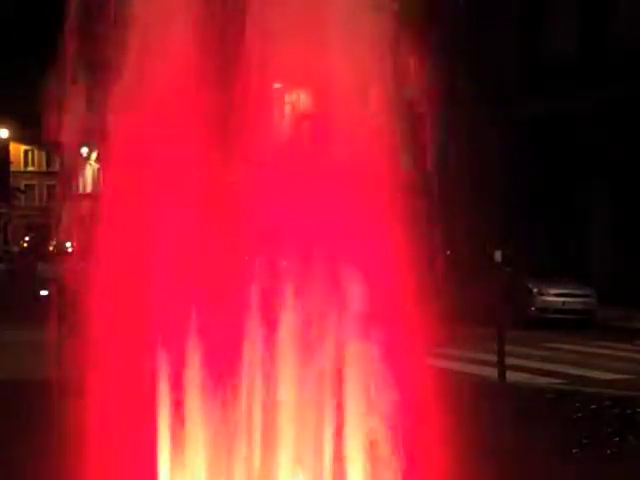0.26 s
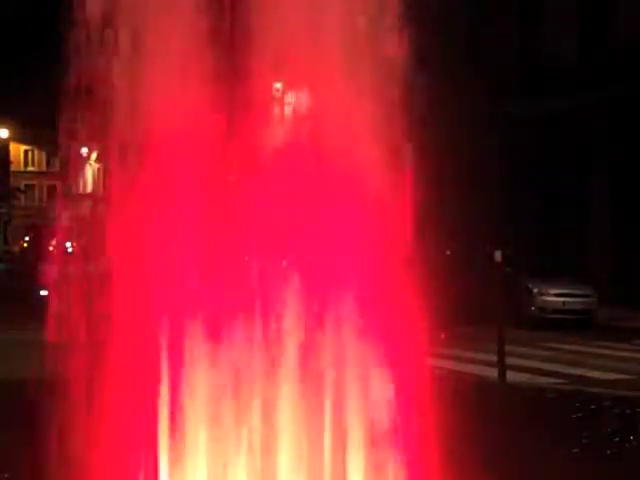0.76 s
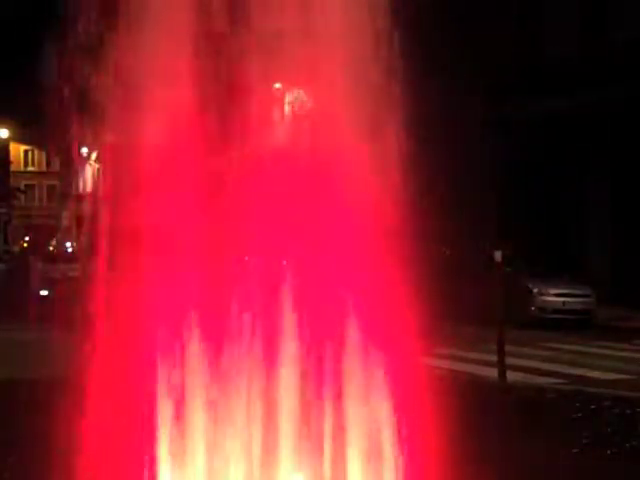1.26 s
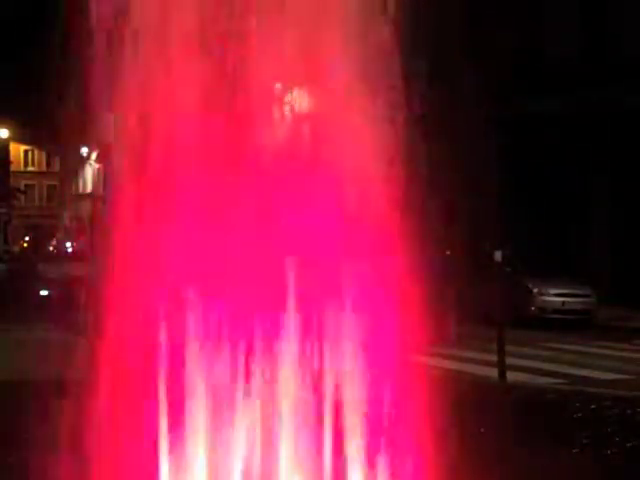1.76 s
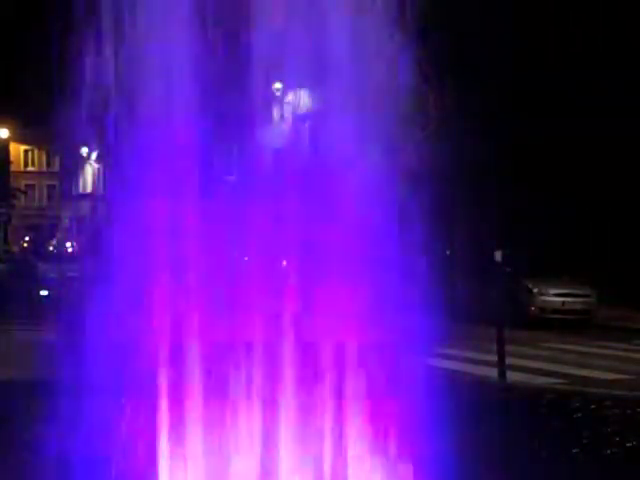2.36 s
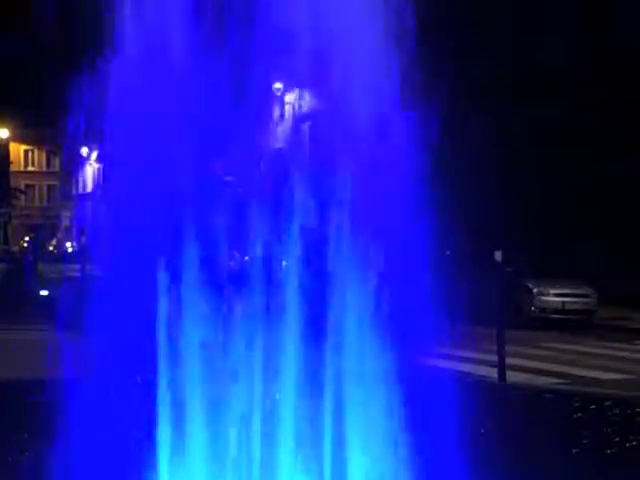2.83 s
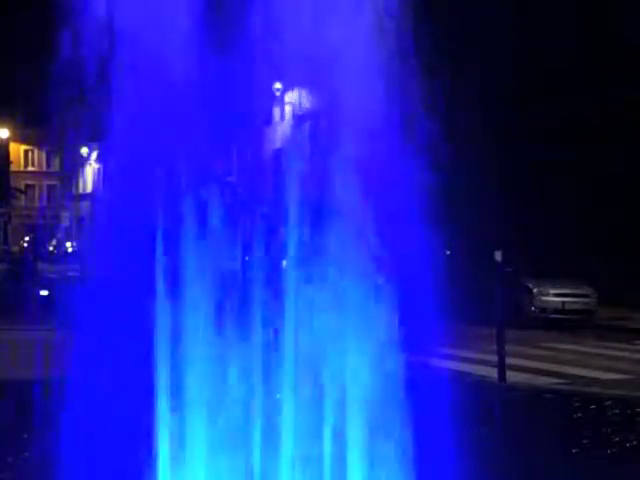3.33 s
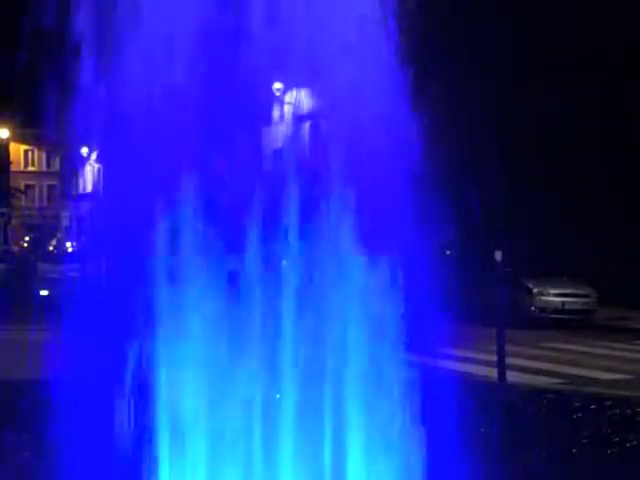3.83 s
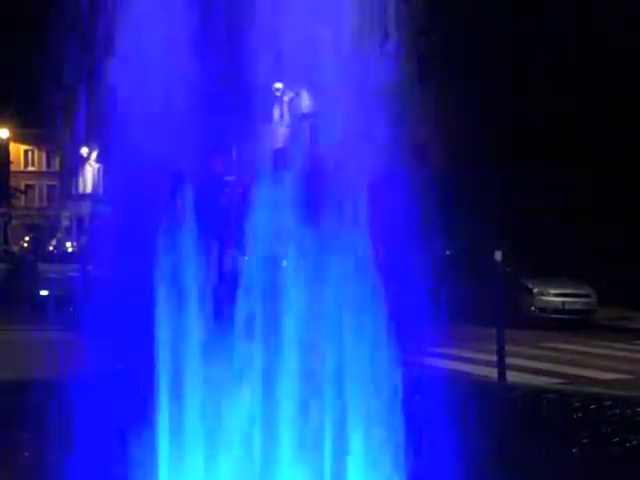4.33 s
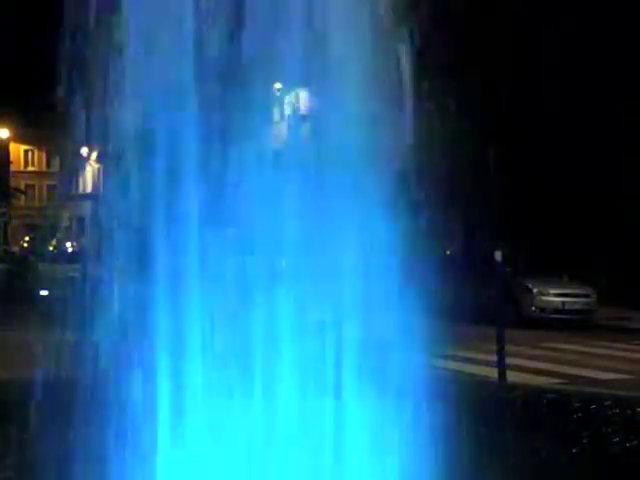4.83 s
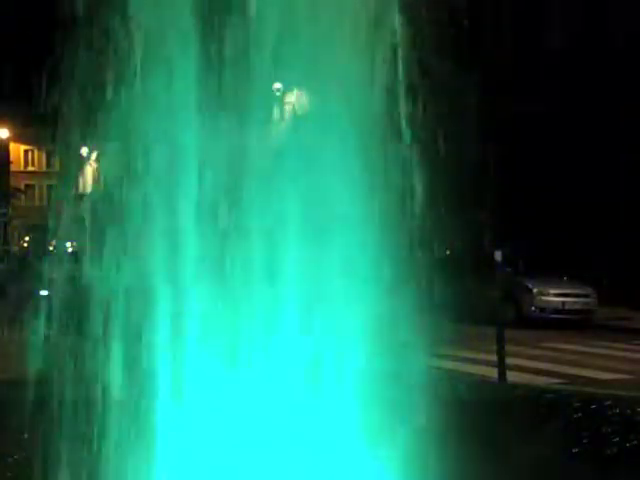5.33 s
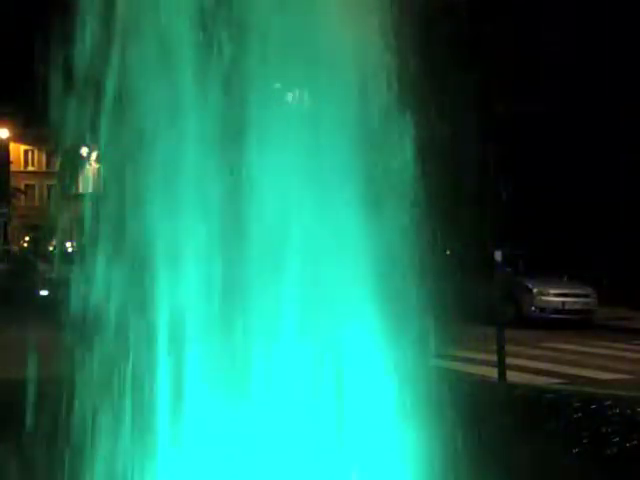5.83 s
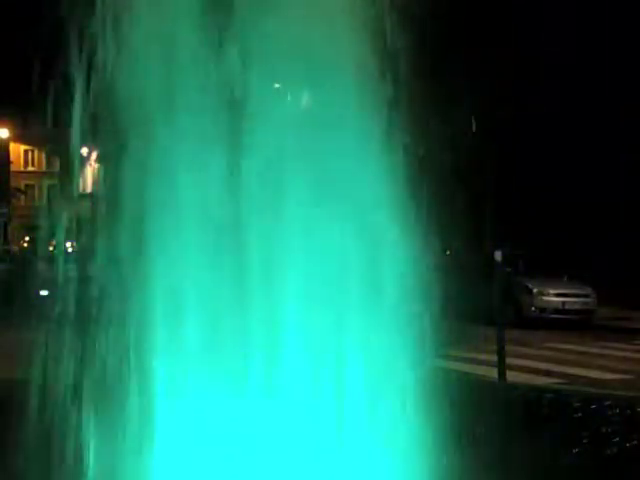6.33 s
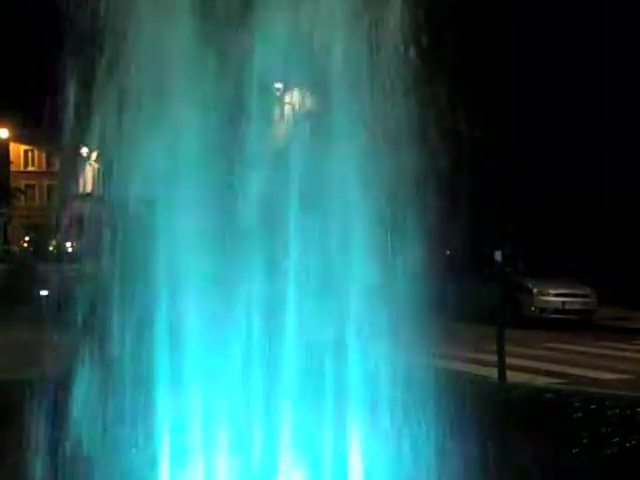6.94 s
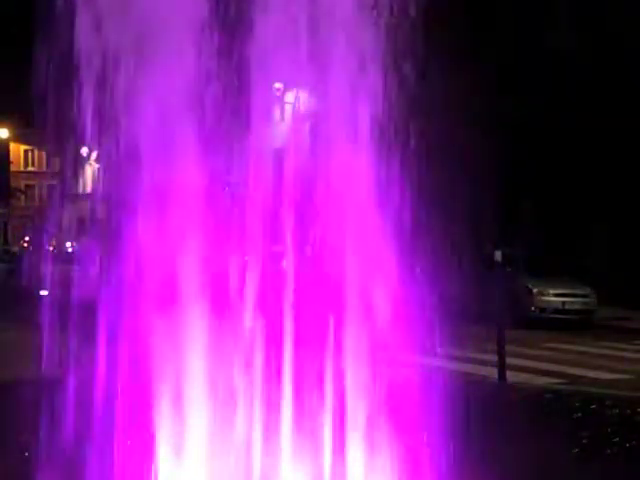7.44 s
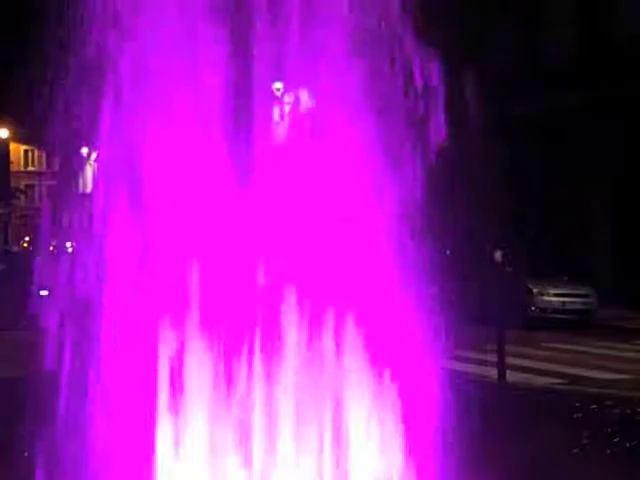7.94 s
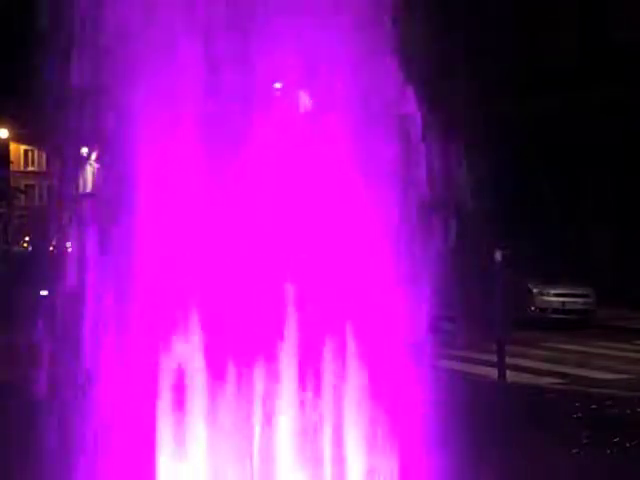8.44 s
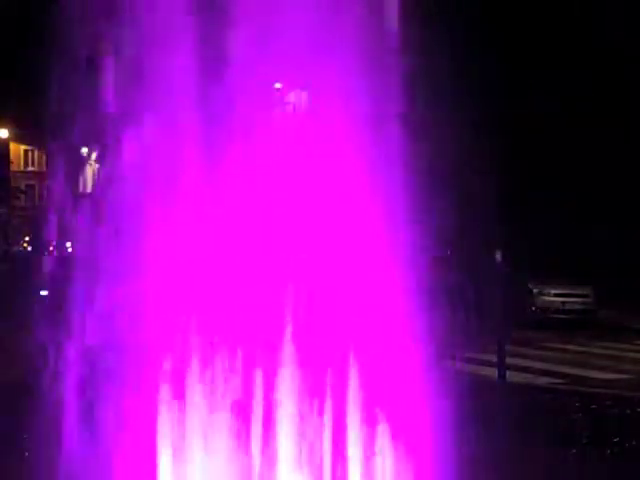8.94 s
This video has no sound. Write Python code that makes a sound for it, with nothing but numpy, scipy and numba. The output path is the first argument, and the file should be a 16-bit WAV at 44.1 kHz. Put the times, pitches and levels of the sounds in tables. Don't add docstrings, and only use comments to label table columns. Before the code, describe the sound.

A strong fountain outdoors at night, heard from a few metres away. A continuous bright hiss of thousands of falling drops crackles and flutters, with irregular slaps on wet paving, sharp near ticks and quiet low bubble gulps. Very faint pump hum, town rumble and a distant engine pulling away lie beneath. Phone-like stereo, crisp and wide in the treble, thin in the bass.

```python
import sys
import numpy as np
from scipy import signal
from scipy.fft import rfft, irfft, next_fast_len
from scipy.io import wavfile
from scipy.ndimage import uniform_filter1d
from numba import njit

SR = 44100
rng = np.random.default_rng(int(sys.argv[2]) if len(sys.argv) > 2 else 0)


def transcribe(u):
    v = np.clip(np.atleast_2d(u).T, -1, 1)
    q = np.round(v * 32767).astype(np.int16)
    wavfile.write(sys.argv[1], SR, q)


def level_to_linear(level):
    exponent = np.asarray(level, float) / 20
    return 10 ** exponent


N = 405274
SIZE = next_fast_len(N)
T, HZ = np.arange(N) / SR, np.fft.rfftfreq(SIZE, 1 / SR)


def colour(points):
    hz, db = np.transpose(points)
    return level_to_linear(np.interp(np.log(HZ + 1), np.log(hz), db))


def walk(rate):
    hold = int(SR / 16 / rate)
    t = T[::16]
    levels = np.repeat(rng.standard_normal(len(t) // hold + 1), hold)
    drift = uniform_filter1d(uniform_filter1d(levels, hold), hold)[:len(t)]
    return np.interp(T, t, drift / drift.std())


def swells(table):
    t = T[::64]
    bells = sum(db * np.exp(-.5 * ((t - s) / width) ** 2) for s, db, width in table)
    return np.interp(T, t, bells)


def tone(hz):
    return np.sin(2 * np.pi * np.cumsum(hz) / SR)


# [f/Hz, level/dB]
TOWN_COLOUR = [(20, -34), (35, -21), (55, -7), (100, -2.5), (200, 0.5), (350, -3), (700, -26), (1500, -40)]
# [t/s, level/dB, width/s]
BASIN_CHURN = [(0.055, -3.0, 0.035), (0.18, 3.9, 0.043), (0.713, 2.6, 0.07), (1.083, -1, 0.1),
               (1.402, 3.5, 0.12), (1.686, -3.0, 0.02), (2.355, -1.3, 0.069), (2.709, 3.5, 0.092),
               (2.948, 1, 0.02), (3.228, -2, 0.03), (3.836, -4, 0.081), (4.31, -2.8, 0.1),
               (4.505, 4, 0.017), (4.58, -3, 0.02), (4.954, -3, 0.048), (5.393, 2.7, 0.084),
               (6.58, -0.5, 0.1), (6.879, -3, 0.029), (7.159, -3, 0.04), (7.403, 3, 0.072),
               (7.847, 1.8, 0.1), (8.346, -2.6, 0.02), (8.546, 3.0, 0.09), (9.034, 2, 0.06)]


def town_rumble():
    rumble = irfft(rfft(rng.standard_normal(SIZE)) * colour(TOWN_COLOUR), SIZE)[:N]
    level_db = 1 - 46.5 + .8 * walk(5) + .9 * swells(BASIN_CHURN)
    return rumble / rumble.std() * level_to_linear(level_db)


# [t/s, turning rate f/Hz]
ENGINE_SPEED = [
    (0, 39.5),
    (2.5, 41.67),
    (6, 50),
    (8, 53.2),
    (9.19, 53.2),
]
# [f/Hz, level/dB]
EXHAUST_PIPE = [(41, -55), (54, -80), (81, -66), (87, -55.5), (102, -56), (106, -63), (125, -53),
                (138, -73)]


def far_engine():
    speed = np.interp(T, *np.transpose(ENGINE_SPEED))
    turn = 2 * np.pi * np.cumsum(speed) / SR
    pipe_hz, pipe_db = np.transpose(EXHAUST_PIPE)
    out = np.zeros(N)
    for order in (1, 2, 3):
        order_db = np.interp(np.log(order * speed), np.log(pipe_hz), pipe_db)
        out = out + level_to_linear(order_db + 5.0 + 0.93 * walk(2.54)) * np.sin(order * turn)
    return out


# [t/s, level/dB, width/s]
LOWER_PUMP_LOAD = [(0.1, -9.1, 0.08), (0.499, 8.4, 0.11), (1.522, 6.6, 0.34), (2.365, -10.9, 0.08),
                   (3.457, 6, 0.12), (4.914, -5.4, 0.08), (4.969, -12.7, 0.3), (5.128, 5.8, 0.08),
                   (5.842, -7, 0.062), (6.395, -8.8, 0.08), (8.166, -5.0, 0.08), (8.446, 3, 0.071),
                   (8.72, -5.7, 0.08), (9.079, 11, 0.08)]
# [t/s, level/dB, width/s]
HIGHER_PUMP_LOAD = [(0.688, -7.5, 0.08), (1.422, -4.4, 0.08), (2.659, 4.5, 0.3), (3.642, -5.5, 0.08),
                    (4.61, -13.6, 0.2), (6.57, 3, 0.43), (7.533, -7, 0.08), (7.533, 5.3, 0.3),
                    (7.852, 3.8, 0.12), (8.156, -7.5, 0.08), (8.401, 8, 0.08), (8.64, -7, 0.3)]


def pumps():
    low_hz = 50 * (1 + 0.0073 * walk(1.6))
    out = level_to_linear(-56 - 2 * T + 2.7 * walk(3.1) + 4.0) * tone(low_hz)
    slowing = 1 / (1 + np.exp((6.9 - T) / 0.51))
    # (pitch Hz, level dB, load, late sag Hz)
    for hz, db, load, sag_hz in ((61.3, -51, LOWER_PUMP_LOAD, 0.78), (77.3, -50, HIGHER_PUMP_LOAD, 5.5)):
        pitch_hz = (hz - sag_hz * slowing) * (1 + 0.0121 * walk(3))
        out = out + level_to_linear(db + swells(load) + 3.5) * tone(pitch_hz)
    return out


@njit
def grains(start, hz, cycles, size, glide, place, places):
    out = np.zeros((places, N + 4096))
    for j in range(len(start)):
        steps = min(int(cycles * SR / hz[j]), 4000)
        ring = np.exp(2j * np.pi * hz[j] / SR - 5 / steps)
        bend = np.exp(2j * np.pi * hz[j] * glide / SR / steps)
        z, rise, quick = size[j] + 0j, 1., np.exp(-4 * hz[j] / SR)
        for i in range(steps):
            out[place[j], start[j] + i] += z.imag * (1 - rise)
            z *= ring
            ring *= bend
            rise *= quick
    return out[:, :N]


def drops(layer, flow_db, shared, count=5):
    rate, lo_hz, hi_hz, cycles, scatter_db, surge_db, glide, db = layer
    when, pitch, rarity, sign, where = rng.random((int(rate * N / SR), 5)).T
    start = (when * N).astype(np.int64)
    hz = lo_hz * (hi_hz / lo_hz) ** pitch
    patches = np.array([walk(40) for _ in range(count)])[(pitch * count).astype(int), start]
    big_db = np.minimum(-scatter_db * np.log(rarity), 13)
    size = hz * level_to_linear(big_db + surge_db * (shared[start] + 1.62 * patches)) * np.sign(sign - .5)
    place = (where * count).astype(np.int64)
    rain = grains(start, hz, float(cycles), size, float(glide), place, count)
    return rain / np.sqrt(np.mean(rain.sum(0) ** 2)) * level_to_linear(flow_db + db)


def hits(s, db, hz, cycles, parts, count=5):
    late_s, part_db = np.transpose(parts)
    place = np.repeat((np.arange(len(s)) + count // 2) % count, len(parts))
    shift = 1 + 0.165 * rng.standard_normal((len(s), len(parts))) * (part_db < -2)
    start = ((s[:, None] + late_s) * SR).astype(np.int64)
    pitch_hz = hz[:, None] * shift
    size = level_to_linear(db[:, None] + part_db)
    return grains(start.ravel(), pitch_hz.ravel(), 1. * cycles, size.ravel(), 0.021, place, count)


# [t/s, peak level/dB, f/Hz]
BUBBLE_GULPS = [(0.13, -24, 450), (0.557, -25, 471), (0.674, -26, 576), (0.708, -19, 476),
                (0.769, -23, 540), (0.863, -24, 468), (1.266, -22.5, 471), (1.399, -29, 577),
                (2.232, -19, 740), (2.649, -22, 829), (2.748, -25, 479), (2.946, -20, 495),
                (3.106, -18, 751), (3.546, -21, 538), (4.503, -17, 754), (4.836, -21, 627),
                (5.399, -27, 479), (6.743, -20, 700), (7.4, -22, 540), (7.849, -25, 447), (8.263, -26, 430),
                (8.4, -23, 471), (8.444, -18, 759), (8.628, -18, 498), (8.659, -20, 353), (9.031, -20, 550)]


def gulps():
    s, db, hz = np.transpose(BUBBLE_GULPS)
    return hits(s, db - 5.5, hz, 17, [(0, -1), (.006, -4.5), (.017, -4.5)])


# [t/s, peak level/dB, f/Hz]
WATER_SLAPS = [(0.3356, -12, 3720), (0.877, -13, 2580), (0.952, -5, 6210), (1.196, -9, 3920),
               (1.5444, -12, 4410), (1.9325, -11, 3140), (1.9579, -8, 3200), (2.2235, -8, 4410),
               (3.016, -13, 2510), (3.266, -11, 4720), (3.471, -14, 3530), (3.6017, -7, 4690),
               (3.8254, -3.5, 2600), (3.899, -0.5, 4800), (4.4408, -12, 3820), (4.7877, -12, 3840),
               (5.231, -5, 3700), (5.7194, -9, 4060), (6.2394, -7, 6320), (6.5166, -13, 4440),
               (6.551, -8, 4260), (6.7111, -8, 4910), (6.9606, -7, 3170), (6.981, -7, 2680),
               (7.3936, -3, 4540), (8.0324, -10, 2740), (8.1549, -10, 3470), (8.736, -16, 2500),
               (8.9486, -10, 3300), (9.0109, -9, 4870)]


def slaps():
    when, level, pitch = rng.random((3, 30))
    lesser = [when * T[-1], -15.5 + 5 * (2 * level - 1), 2200 + 2800 * pitch]
    s, db, hz = np.hstack([np.transpose(WATER_SLAPS), lesser])
    return hits(s, db + 4, hz, 5.2, [(0, -35), (.0009, 2.5), (.0026, -8)])


# [t/s, peak level/dB]
NEAR_TICKS = [(0.3331, -1), (0.405, 0), (0.9263, -1), (1.1957, -3), (1.2945, -1), (1.5604, -1),
              (1.6008, -5), (1.958, 3.5), (2.2488, -3), (2.4149, -4), (2.5561, -9), (2.7277, 0), (3.489, 0),
              (3.5176, -2), (3.675, -1), (3.8249, 2.5), (3.899, 0), (3.9814, -3), (4.3131, -8.5),
              (4.6773, -4), (5.3288, -3), (5.7204, -1), (6.5889, -3), (6.7057, 0), (7.3931, -5),
              (8.034, -1), (8.0556, -1), (8.6662, -4), (8.845, -1), (4.2393, -1)]


def ticks():
    when, level = rng.random((2, 30))
    s, db = np.hstack([np.transpose(NEAR_TICKS), [when * T[-1], -13.5 + 5 * (2 * level - 1)]])
    hz = 6000 + 2500 * rng.random(len(s))
    return hits(s, db - 8, hz, 7.2, [(.0003, -3.5), (.0009, 4), (.0018, -2), (.003, -2), (.0046, -4)])


# [rate/(1/s), lowest f/Hz, highest f/Hz, ring/cycles, size scatter/dB, surge/dB, glide/share, level/dB]
ROAR_DROPS = (3500.5, 213, 1596, 7, 2.5, 0.4, -0.2, -1)
SPLASH_DROPS = (7999, 1498, 4800, 4, 2, 1.25, -0.05, -3)
PLINK_DROPS = (499, 798, 6000, 17, 3, .5, 0.04, -9)
SPRAY_DROPS = (12003, 4002, 9500, 2.5, 2.5, 0.98, 0.4, -5)
MIST_DROPS = (11998, 9000, 15000, 3.5, 0, -0.7, 1.3, -12)
# [t/s, level/dB, width/s]
SHEET_SURGES = [(0.414, 0, 0.015), (0.683, 3.3, 0.025), (0.878, 3, 0.011), (1.292, 1.2, 0.013),
                (1.377, 1.8, 0.07), (1.556, 1.5, 0.015), (1.901, 2.5, 0.043), (1.961, -2, 0.013),
                (2.235, 2.3, 0.015), (2.42, 3, 0.015), (2.554, 3.2, 0.015), (2.749, 1, 0.062),
                (3.298, 2.2, 0.021), (3.372, 1.5, 0.014), (3.492, 4, 0.013), (3.806, 3.5, 0.02),
                (3.901, 1.2, 0.017), (4.694, 3, 0.0099), (5.298, 2.5, 0.063), (5.532, 3.5, 0.025),
                (6.196, 1, 0.045), (6.395, 2.5, 0.035), (7.219, 3, 0.018), (7.393, 2, 0.015),
                (7.912, 1.7, 0.15), (8.037, 0.5, 0.012), (8.511, 2.7, 0.11), (8.985, 2.5, 0.031)]
# [t/s, level/dB, width/s]
FALL_LULLS = [(0.035, -2, 0.025), (0.559, -0.5, 0.07), (1.137, -3, 0.07), (1.252, -2, 0.014),
              (1.626, -2, 0.028), (1.751, -1.8, 0.025), (2.0, -2, 0.015), (2.06, -1.2, 0.07),
              (2.484, -1.0, 0.025), (3.208, -3, 0.028), (3.432, -1.0, 0.023), (3.861, -2.5, 0.017),
              (3.956, -2.5, 0.015), (4.066, -2.2, 0.048), (4.45, -1, 0.12), (4.615, -3, 0.015),
              (4.904, -2, 0.079), (5.143, -4, 0.015), (5.971, -3, 0.015), (6.49, -2.5, 0.015),
              (6.75, -1.2, 0.015), (7.129, -2, 0.015), (7.283, -2, 0.015), (7.548, -1.2, 0.07),
              (8.107, -3.5, 0.02), (8.286, -3.5, 0.044), (8.566, -3, 0.02), (8.9, -2.3, 0.018)]


def falling_water():
    flow_db = swells(SHEET_SURGES + FALL_LULLS)
    flurry = 0.48 * walk(70) + 0.91 * walk(170)
    shared = 0.84 * (flurry - uniform_filter1d(flurry, size=SR // 16))
    shared = np.clip(shared + 0.28 * shared ** 2, -3, 3.5)
    spray_db, splash_db, roar_db = -20, -27.5, -34.5
    water = drops(ROAR_DROPS, roar_db + 1.04 * swells(BASIN_CHURN) + 0.38 * walk(25), 0.31 * shared)
    water = water + drops(SPLASH_DROPS, splash_db + flow_db + 0.42 * walk(15), shared)
    water = water + drops(PLINK_DROPS, splash_db + flow_db, shared)
    water = water + drops(SPRAY_DROPS, spray_db + 0.73 * flow_db, shared)
    return water + drops(MIST_DROPS, spray_db + 3 + 0.52 * flow_db, shared)


# [f/Hz, level/dB]
WATER_COLOUR = [(150, -6), (300, -4), (450, 3), (800, 0), (1300, -3.5), (2200, .5), (4000, 0),
                (8000, -1.13), (11000, 0.9), (13500, 7.5)]


def fountain():
    water = gulps() + slaps() + ticks() + falling_water()
    spectra = rfft(water, SIZE) * colour(WATER_COLOUR)
    lag_s = (17.4 + 18.7 * np.linspace(-np.sqrt(2), np.sqrt(2), len(water))) / 880000.0
    left = sum(x * np.exp(-2j * np.pi * HZ * t) for x, t in zip(spectra, lag_s))
    return irfft(np.array([left, spectra.sum(0)]), SIZE)[:, :N]


def scene():
    street = town_rumble() + far_engine() + pumps()
    return street + fountain()


def top_cut(x):
    return signal.sosfilt(signal.butter(12, 15480, fs=SR, output="sos"), x)


# [f/Hz, sharpness]
PORT_RINGS = [(7843, 7.83), (6420, 6.77)]


def record(dry):
    left, right = (x / (1 - (HZ / hz) ** 2 + 1j * HZ / hz / sharpness)
                   for x, (hz, sharpness) in zip(rfft(dry, SIZE), PORT_RINGS))
    right = right * level_to_linear(7.7 * np.exp(-((HZ - 10300) / 1600) ** 2) - 20.6 * (HZ / 13000) ** 2.21)
    mid = (left + right) / 2
    side = (left - right) / 2 * (0.088 + 0.84 / (1 + (5700 / (HZ + 1)) ** 16))
    thin = 0.933 * HZ / (HZ - 42j) + 0.017 * HZ / (HZ + 300)
    out = irfft(np.array([(mid + side) * thin, mid - side]), SIZE)[:, :N]
    top = signal.ellip(14, .3, 70, 14165, fs=SR, output="sos")
    mix = signal.sosfilt(top, np.clip(out, -.86, .86))
    return top_cut(mix)


dry = scene()
out = record(dry)
transcribe(out)
```